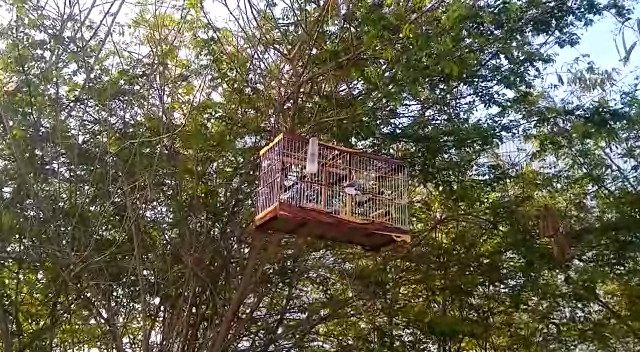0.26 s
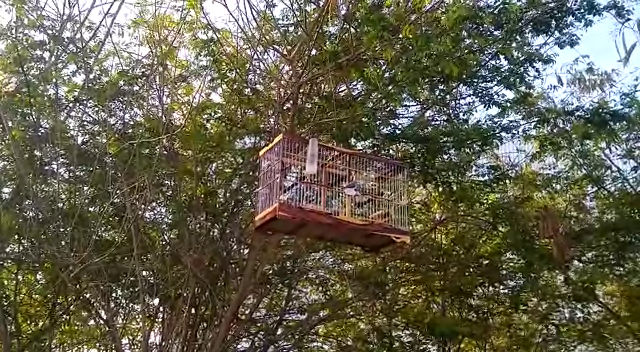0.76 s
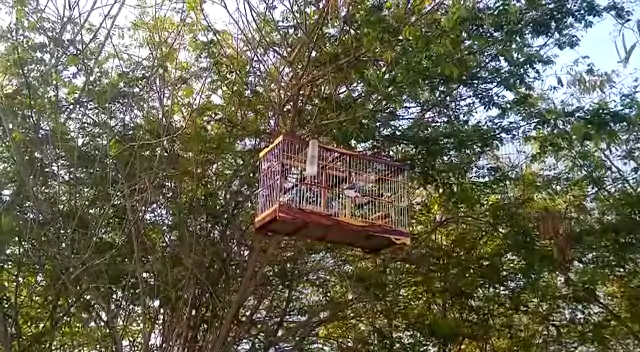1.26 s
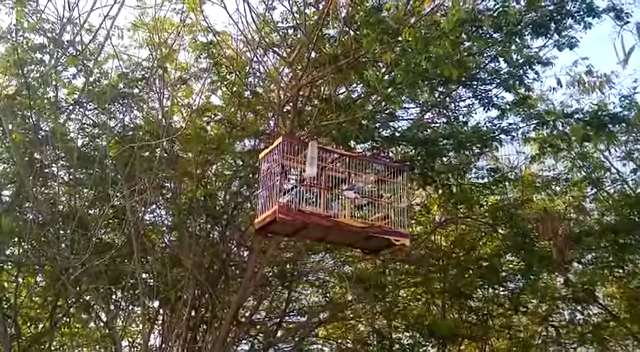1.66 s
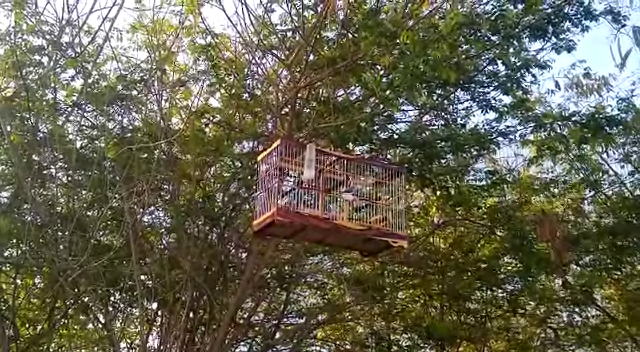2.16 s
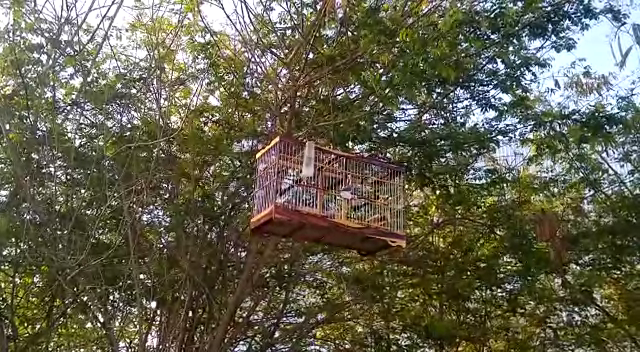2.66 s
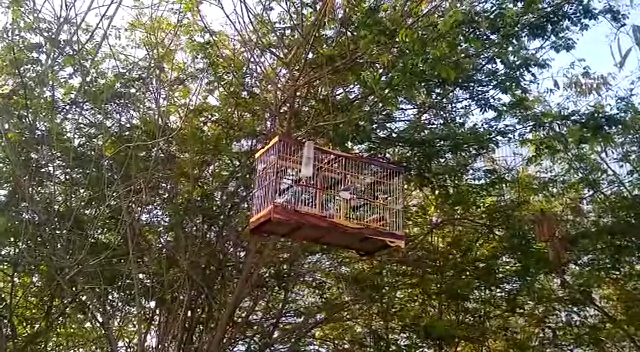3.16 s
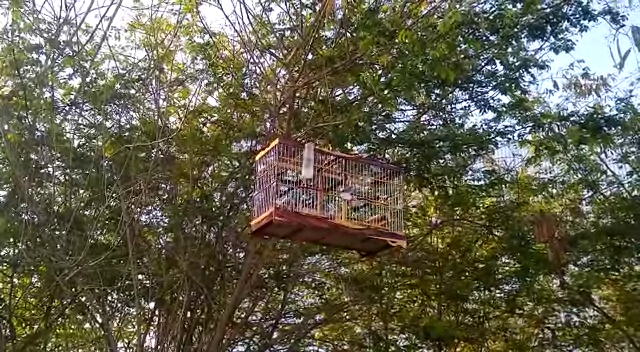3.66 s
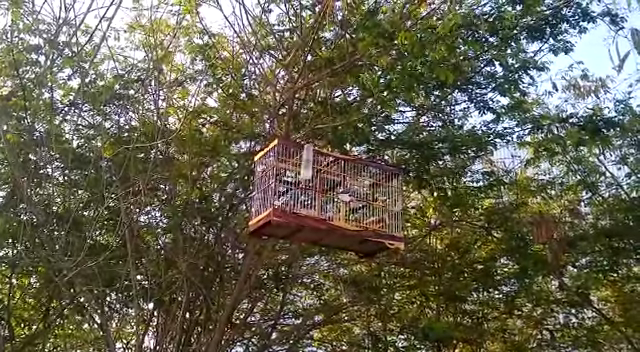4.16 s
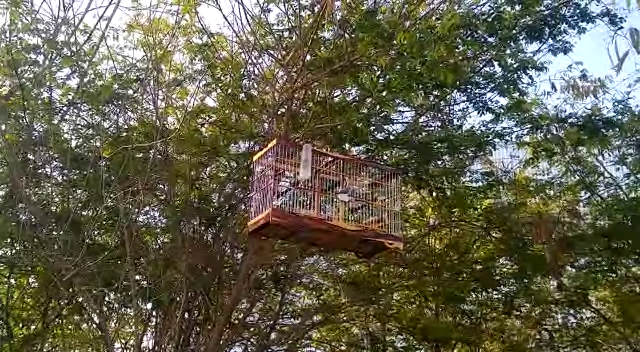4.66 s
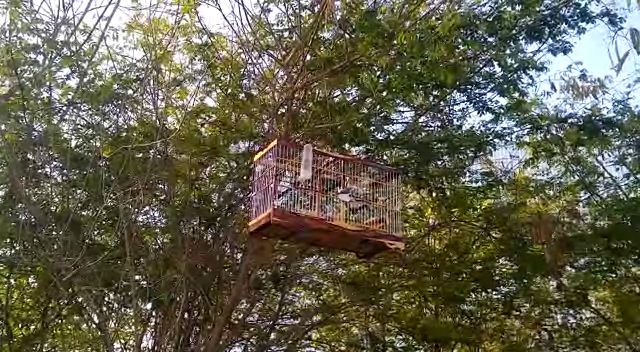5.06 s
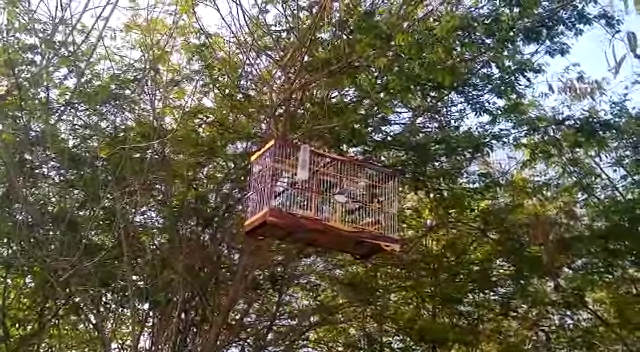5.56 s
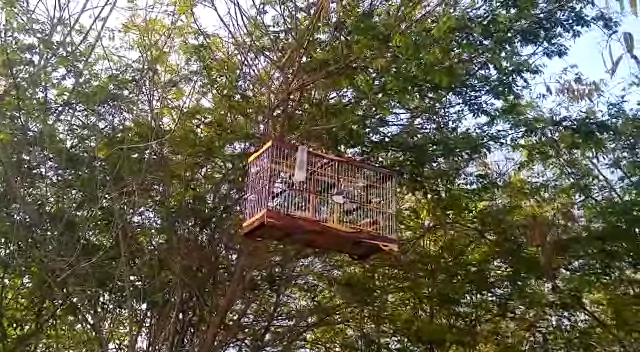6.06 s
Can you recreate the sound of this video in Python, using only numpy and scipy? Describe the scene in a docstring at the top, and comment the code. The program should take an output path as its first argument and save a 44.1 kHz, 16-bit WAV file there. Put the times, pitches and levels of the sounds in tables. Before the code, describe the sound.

Four warbled rising whistles and three sharp falling chirps from a near bird, then quiet leaf hiss, far twitters and one short harsh call.

```python
"""Caged songbird in a tree

A small bird ends a phrase: four warbled rising whistles, three tumbling falling calls, later one harsh
two-voiced call. Its whistles are warbled sines with overtones and breath; the harsh call mixes two pitches.
Far birds twitter and pipe as thin glides, over hum, leaf hiss and rumble of filtered noise; a claw ticks.
Trees and walls answer with decaying noise echoes; the phone's expander turns the quiet moments down."""
import sys
import numpy as np
from scipy import signal
from scipy.fft import rfft, irfft, next_fast_len
from scipy.io import wavfile
from scipy.ndimage import uniform_filter1d, minimum_filter1d, map_coordinates

SR = 44100
rng = np.random.default_rng(int(sys.argv[2]) if len(sys.argv) > 2 else 0)


def wav_out(sig):
    """Save sig, one row per channel (or a flat mono array), as 16-bit PCM at SR to the path in sys.argv[1]."""
    wavfile.write(sys.argv[1], SR, np.round(np.clip(np.atleast_2d(sig).T, -1, 1) * 32767).astype(np.int16))


N = 278701


def amp(db):
    """Decibels to gain."""
    return 10 ** (np.asarray(db) / 20)


def unit(x):
    """Scaled to rms 1."""
    return x / np.sqrt(np.mean(x ** 2) + 1e-20)


def along(points, hz, axis=1):
    """One column of (Hz, value, ..) points, interpolated on a log frequency axis."""
    p = np.transpose(points)
    return np.interp(np.log(hz + 1), np.log(p[0] + 1), p[axis])


def wobble(knots_per_s, size=N):
    """A smooth random curve through normally distributed knots."""
    knots = rng.standard_normal(int(size * knots_per_s / SR) + 4)
    return map_coordinates(knots, [np.arange(size) * knots_per_s / SR])


def filtered(x, response):
    """x times a complex response of frequency."""
    m = next_fast_len(N + SR // 2)
    return irfft(rfft(x, m) * response(np.fft.rfftfreq(m, 1 / SR)), m)[..., :N]


def shaped_noise(points, size=N):
    """Noise of rms 1 with its spectrum along (Hz, dB per Hz) points."""
    return unit(filtered(rng.standard_normal(size), lambda hz: amp(along(points, hz))))


def sampled(rows):
    """First sample, then one value per sample for time and each column of a note."""
    s, *cols = np.transpose(rows)
    t = np.arange(round(s[0] * SR), round(s[-1] * SR)) / SR
    return round(s[0] * SR), t, [np.interp(t, s, c) for c in cols]


# Hiss spectrum. Each row: frequency in Hz, relative density in dB per Hz.
AIR_SPECTRUM = [(30, -46.5), (48, -5), (85, -14.5), (125, -10), (160, -10.5), (250, -13), (312, -15),
                (410, -15), (720, -17), (920, -19.5), (1800, -22.5), (4500, -30.5), (8000, -34.5),
                (15800, -38)]
# Left-right likeness of the hiss. Each row: frequency in Hz, correlation from 0 to 1.
LIKENESS = [(60, .85), (290, .92), (640, .62), (1400, .5), (2500, .15), (6000, 0)]
# Distant drone. Each row: centre in Hz, width in Hz, mean level in dB.
DRONE = [(81, 25, -63.5), (330, 35, -65), (361, 15, -70.5), (1930, 152, -75.5)]
# Low rumble that swells and sinks. Each row: time in seconds, level in dB before its random wobble.
RUMBLE_SWELL = [(0, -81), (0.403, -69), (.9, -55), (1.4, -70), (2, -64), (2.699, -65), (3.4, -65.5),
                (4, -68.5), (4.601, -58), (5.2, -69.5), (5.8, -68), (6.32, -76.5)]


def air():
    """Drone and leaf hiss from the left, alike in the bass and unrelated in the treble, over a rumble."""
    z = signal.stft(rng.standard_normal((2, N)), nperseg=512)[2]
    field = uniform_filter1d(uniform_filter1d(rng.standard_normal(z.shape[1:]), 6, 0), 14, 1)
    pair = signal.istft(z * amp(0.4 * unit(field)), nperseg=512)[1][:, :N]

    def mid_side_response(hz):
        turn = np.arccos(np.clip(along(LIKENESS, hz), -1, 1)) / 2
        return amp(along(AIR_SPECTRUM, hz)) * [np.cos(turn), np.sin(turn)]

    def band(centre_hz, width_hz, size=N):
        noise = rng.standard_normal(size)
        return unit(filtered(noise, lambda hz: np.exp(-((hz - centre_hz) / width_hz) ** 2)))

    mid, side = filtered(pair, mid_side_response)
    hiss = amp(-57.5 + .8 * wobble(1.5)) * unit(np.array([mid + side, mid - side]))
    left, right = hiss + sum(amp(db + 1.3 * wobble(2.5)) * band(hz, width) for hz, width, db in DRONE)
    swell_db = np.interp(np.arange(N) / SR, *np.transpose(RUMBLE_SWELL)) + 2.5 * wobble(16)
    rumble = amp(swell_db) * band(69, 64, size=(3, N))
    late_right = np.roll(right, 17)  # samples
    both = np.array([left, late_right]) + rumble[0] + 0.64 * rumble[1:]
    return both * amp([[-.7], [.7]])


# Breath in the song. Each row: frequency in Hz, relative density in dB per Hz.
SONG_BREATH = [(2000, -28), (5000, -10), (8500, -6), (10700, 0), (12300, -5), (14500, 2), (15900, 1)]
# How strongly overtones sound, by frequency. Each row: frequency in Hz, gain in dB.
OVERTONE_GAIN = [(6000, -14), (7500, -8), (8800, -2), (9700, -3), (10700, 5), (11800, -4), (13000, -3),
                 (14500, 2), (16000, 0)]


def whistles(notes, warble_hz, slowing_per_s, pulse, second_db, third_db, breath_db, husk, edge_s):
    """A near-pure tone; the warble swings pitch, pulses level and leaks breath, as do husky notes."""
    out, leak = np.zeros(N), np.zeros(N)
    for rows in notes:
        i, t, (hz, db, depth_hz) = sampled(rows)
        rate_hz = warble_hz * (1 - slowing_per_s * (t - t[0]))
        swing = 2 * np.pi * (np.cumsum(rate_hz) / SR + rng.random()) + .7 * wobble(70, size=len(t))
        swung_hz = hz + depth_hz * amp(1.5 * wobble(90, size=len(t))) * np.sin(swing)
        phase = 2 * np.pi * np.cumsum(swung_hz) / SR
        tone = np.sin(phase) + amp(second_db + along(OVERTONE_GAIN, 2 * hz)) * np.sin(2 * phase)
        tone += amp(third_db + along(OVERTONE_GAIN, 3 * hz)) * (3 * hz < SR / 2) * np.sin(3 * phase)
        fourth = amp(third_db + along(OVERTONE_GAIN, 4 * hz)) * (4 * hz < SR / 2)
        tone += fourth * np.clip(depth_hz / 300, 0, 1) * np.sin(4 * phase)
        begun = np.clip((t - t[0]) / edge_s, 0, 1) if i else 1  # a note at sample 0 is already under way
        ends = np.sin(np.pi / 2 * begun * np.clip((t[-1] - t) / edge_s, 0, 1)) ** 2
        beat = 1 + np.clip(pulse * depth_hz / hz, 0, .95) * np.sin(swing + 0.43)
        level = np.sqrt(2) * amp(db + .6 * wobble(250, size=len(t)))
        out[i:i + len(t)] += level * ends * beat * tone
        opening = np.abs(depth_hz) / hz + husk * (hz < 6000) * (i > 0)
        leak[i:i + len(t)] += amp(db + breath_db) * ends * opening
    return out + uniform_filter1d(leak, 500) * shaped_noise(SONG_BREATH)


# End of an earlier note. Each row: time in seconds, pitch in Hz, level in dB, warble depth in Hz.
EARLIER_NOTE = [(0, 3790, -29, 0.006), (.012, 3600, -30.5, 0), (.032, 3720, -38, 0.0038)]


def earlier_note():
    """Rows of a note already sounding at the start, dipping in pitch and fading."""
    return EARLIER_NOTE


# Rising whistles. Each row: start in s, warble settled in s, end in s, top pitch in Hz, level before
# the climb in dB, level the climb leads to in dB, last kick up in Hz.
RISING_NOTES = [(.136, 0.193, 0.27, 4782, -37.5, -12.5, 40), (.335, 0.423, 0.4876, 4787, -32.5, -11.5, 110),
                (.546, 0.639, 0.7023, 4702, -31.5, -12.5, 168), (.762, 0.865, 0.91, 4535, -31.5, -14, 173)]
# Shared climb. Each row: seconds before the end, share of the way to top pitch, share to peak level.
SHARED_CLIMB = [(.125, 0.024, 0.12), (.095, .1, 0.081), (.075, .27, .3), (.058, .5, 0.58), (0.039, .8, 0.9),
                (.015, 0.96, 0.96), (0.014, 0.99, 0.97)]
BASE_HZ = 3272  # before the climb
WARBLE_DEPTH_HZ, STEADY_DEPTH_HZ, SETTLING_S = 499.8, 30, .022
DEPTH_SHARE_BEFORE_SETTLING, HANG_SHARE = 0.71, .35  # warble hangs under the climb by a share of depth
ONSET_DB, ONSET_S = 21, .015  # starts this far down and recovers
CLOSE_DB, CLOSE_S = 5, .015  # sinks at the end
KICK_BEFORE_END_S, KICK_TAKES_S, KICK_DB_PER_HZ = .021, .008, 0.02


def rising():
    """Rows (s, Hz, dB, depth Hz) of each rising whistle: a soft warble, one shared climb, a quick close."""
    before, pitch, level = np.transpose(SHARED_CLIMB)
    for start, steady, end, top_hz, low_db, peak_db, kick_hz in RISING_NOTES:
        t = np.linspace(start, end, 40)
        pitch_share = np.interp(t - end, -before, pitch)
        level_share = np.interp(t - end, -before, level)
        hz = BASE_HZ + (top_hz - BASE_HZ) * pitch_share
        db = low_db + (peak_db - low_db) * level_share - ONSET_DB * np.exp((start - t) / ONSET_S)
        db -= CLOSE_DB * np.clip(1 - (end - t) / CLOSE_S, 0, 1)
        # pitch waits below the climb until the kick releases it
        unreleased = np.clip((end - KICK_BEFORE_END_S - t) / KICK_TAKES_S + 1, 0, 1)
        waiting_hz = kick_hz * pitch_share * unreleased
        hz, db = hz - waiting_hz, db - KICK_DB_PER_HZ * waiting_hz
        depths_hz = [WARBLE_DEPTH_HZ, DEPTH_SHARE_BEFORE_SETTLING * WARBLE_DEPTH_HZ, STEADY_DEPTH_HZ]
        depth_hz = np.interp(t, [start, steady - SETTLING_S, steady], depths_hz)
        yield np.transpose([t, hz - HANG_SHARE * depth_hz, db, depth_hz])


# Slides that open the falling calls. Each row: start in s, knee in s, end in s, first pitch in Hz
# before the hook, knee pitch in Hz, last pitch in Hz, knee level in dB, last level in dB.
FALLING_SLIDES = [(0.957, .985, 1.013, 7100, 6600, 5640, -21.5, -19),
                  (1.13, 1.155, 1.186, 7400, 7080, 6006, -19.5, -24),
                  (1.335, 1.358, 1.386, 7900, 7530, 6150, -19, -25)]
HOOK_HZ, HOOK_S = 350, 0.0055  # drops in from above
SLIDE_IN_DB = 15  # starts this far down
SLIDE_CLEAR_HZ, SLIDE_ROUGH_HZ = 15, 90  # warble depth up to the knee and at the end


def slides():
    """Rows of the slides: they hook in, swell to the knee and then roughen."""
    for s0, s1, s2, hz0, hz1, hz2, db1, db2 in FALLING_SLIDES:
        t = np.linspace(s0, s2, 30)
        hz = np.interp(t, [s0, s1, s2], [hz0, hz1, hz2]) + HOOK_HZ * np.exp((s0 - t) / HOOK_S)
        db = np.interp(t, [s0, s1, s2], [db1, db1, db2])
        db -= SLIDE_IN_DB * np.clip((s1 - t) / (s1 - s0), 0, 1) ** 1.6
        depth_hz = np.interp(t, [s1, (s1 + s2) / 2], [SLIDE_CLEAR_HZ, SLIDE_ROUGH_HZ])
        yield np.transpose([t, hz, db, depth_hz])


# Flicks that tumble after the slides. Each row: start in s, loudest in s, end in s, first pitch in Hz,
# loudest pitch in Hz, last pitch in Hz, peak level in dB.
TUMBLING_FLICKS = [(1.012, 1.014, 1.02, 4730, 5100, 5550, -19),
                   (1.017, 1.025, 1.034, 5400, 5500, 5650, -12),
                   (1.033, 1.046, 1.06, 4653, 5150, 5100, -13.5),
                   (1.058, 1.069, 1.083, 4136, 5100, 5100, -13.5),
                   (1.178, 1.183, 1.187, 4736, 5040, 5230, -28.5),
                   (1.182, 1.192, 1.203, 5498, 5600, 5850, -16),
                   (1.198, 1.202, 1.208, 4170, 4600, 4960, -23),
                   (1.204, 1.219, 1.226, 4458, 5050, 5040, -13),
                   (1.223, 1.241, 1.255, 3750, 4550, 5000, -18.5),
                   (1.382, 1.384, 1.389, 4420, 5000, 5200, -26.5),
                   (1.387, 1.398, 1.407, 5580, 5405, 5450, -13.5),
                   (1.403, 1.407, 1.412, 4353, 4615, 5300, -23.5),
                   (1.408, 1.422, 1.43, 4340, 4883, 5030, -14.5),
                   (1.43, 1.447, 1.465, 3650, 4450, 5130, -20)]
FLICK_IN_DB, FLICK_OUT_DB, FADE_POWER = 19, 15, 1.8  # under the peak at both ends
CLEAR_DEPTH_HZ, ADDED_DEPTH_HZ = 25, 90  # warble at the peak, and added to it at the ends
HALFWAY_SHARE = 0.82  # of the last pitch change, made halfway through it


def flicks():
    """Rows of the flicks: short pitch sweeps, loudest and clearest inside."""
    for s0, s1, s2, hz0, hz1, hz2, db in TUMBLING_FLICKS:
        t = np.linspace(s0, s2, 20)
        away = np.interp(t, [s0, s1, s2], [1, 0, 1]) ** FADE_POWER
        halfway_hz = hz1 + HALFWAY_SHARE * (hz2 - hz1)
        hz = np.interp(t, [s0, s1, (s1 + s2) / 2, s2], [hz0, hz1, halfway_hz, hz2])
        fade_db = np.where(t > s1, FLICK_OUT_DB, FLICK_IN_DB) * away
        yield np.transpose([t, hz, db - fade_db, CLEAR_DEPTH_HZ + ADDED_DEPTH_HZ * away])


# Low closing notes. Each row: start in s, point in s, end in s, first pitch in Hz, point pitch in Hz,
# last pitch in Hz, level at the point in dB.
CLOSING_NOTES = [(1.248, 1.263, 1.292, 3300, 3850, 3007, -31.5),
                 (1.451, 1.475, 1.498, 3421, 3993, 3183, -31.5)]
POINT_POWER, CLOSING_IN_DB, CLOSING_OUT_DB = 2.8, 12, 16


def closing_notes():
    """Rows of the low notes ending the last two falling calls: pitch climbs to a point and sinks."""
    for s0, s1, s2, hz0, hz1, hz2, db in CLOSING_NOTES:
        t = np.linspace(s0, s2, 30)
        near, late = np.interp(t, [s0, s1, s2], [0, 1, 0]), t > s1
        foot_hz = np.where(late, hz2, hz0)
        hz = foot_hz + (hz1 - foot_hz) * near ** POINT_POWER
        fade_db = np.where(late, CLOSING_OUT_DB, CLOSING_IN_DB) * (1 - near) ** 3
        yield np.transpose([t, hz, db - fade_db, CLEAR_DEPTH_HZ + 0 * t])


# Tone colour of the far birds, loudest near 4.6 kHz. Each row: frequency in Hz, gain in dB.
FAR_COLOUR_GAIN = [(1400, 1.5), (3000, -7.5), (4600, 7.5), (6000, 0), (8000, -5)]


def far_birds(table, bend, rough_db, pan_db):
    """Thin sine glides, steep at first for a positive bend, flickering through the leaves."""
    out = np.zeros((2, N))
    for s0, s1, hz0, hz1, db in table:
        u = np.linspace(0, 1, round((s1 - s0) * SR))
        hz = hz1 + (hz0 - hz1) * (np.exp(-bend * u) - np.exp(-bend)) / (1 - np.exp(-bend))
        tone = np.sin(2 * np.pi * np.cumsum(hz) / SR + [[0], [1.3]])
        level_db = db + along(FAR_COLOUR_GAIN, hz) + rough_db * wobble(120, size=len(u))
        shape = np.sin(np.pi * u) ** 0.3 * amp(level_db)
        out[:, round(s0 * SR):][:, :len(u)] += amp([[pan_db / 2], [-pan_db / 2]]) * shape * tone
    return out


# Each row: start in s, end in s, first pitch in Hz, last pitch in Hz, level before colour gain in dB.
TWITTER_NOTES = [(1.715, 1.735, 4500, 3950, -65), (1.755, 1.772, 4520, 3800, -67),
                 (1.764, 1.81, 7200, 3536, -59.5), (1.824, 1.852, 4450, 3025, -56.5),
                 (1.843, 1.89, 5570, 3490, -55.5), (1.992, 2.03, 7050, 4014, -68),
                 (2.012, 2.05, 5600, 3880, -67), (2.076, 2.125, 6760, 3380, -64.5),
                 (2.252, 2.272, 4510, 3590, -57.5), (2.254, 2.306, 6800, 3830, -62.5),
                 (2.298, 2.315, 6530, 5700, -73.5), (2.346, 2.37, 5790, 3930, -65),
                 (2.352, 2.385, 5500, 4790, -73), (2.404, 2.42, 4800, 3865, -67),
                 (2.41, 2.47, 7900, 3304, -64.5), (2.828, 2.87, 7140, 3680, -68),
                 (3.018, 3.072, 6400, 3600, -66.5), (3.126, 3.156, 6800, 3870, -66.5),
                 (3.228, 3.25, 5600, 4230, -68), (3.495, 3.53, 5600, 3506, -70.5),
                 (3.645, 3.66, 5340, 4000, -58.5), (3.71, 3.74, 5000, 3670, -67),
                 (3.872, 3.886, 6830, 5600, -69.5), (4.043, 4.065, 6400, 5200, -71),
                 (4.045, 4.072, 4030, 3100, -67), (4.09, 4.13, 5600, 3900, -74),
                 (4.275, 4.32, 5600, 3953, -69.5), (4.958, 4.985, 5900, 4000, -71.5)]


def twitter():
    """Quick far falling glides, steep at first and rough in level, toward the right."""
    return far_birds(TWITTER_NOTES, bend=1.1, rough_db=3.5, pan_db=-3.5)


# Each row: start in s, end in s, first pitch in Hz, last pitch in Hz, level before colour gain in dB.
PIPING_NOTES = [(1.795, 1.815, 1522, 1522, -65), (1.897, 1.935, 1545, 1520, -62),
                (1.903, 1.94, 4800, 4550, -63), (1.945, 1.975, 4650, 4550, -68),
                (3.105, 3.26, 6750, 6350, -74), (3.615, 3.66, 4700, 4640, -64),
                (3.615, 3.64, 5140, 5100, -70), (4.0, 4.05, 1380, 1395, -69),
                (4.125, 4.24, 2720, 2720, -60), (4.35, 4.4, 2700, 2680, -68), (4.36, 4.4, 4810, 4530, -76),
                (4.45, 4.5, 5060, 4950, -75), (4.66, 4.7, 2840, 2814, -67), (4.78, 4.84, 2870, 2867, -58),
                (4.855, 4.93, 2850, 2820, -56), (5.34, 5.375, 4150, 4100, -74),
                (5.57, 5.62, 4600, 4530, -77), (5.65, 5.685, 4500, 4400, -74),
                (5.77, 5.83, 1400, 1656, -70), (5.9, 5.95, 4470, 4700, -75), (6.09, 6.17, 4340, 4290, -74),
                (6.25, 6.28, 2626, 2596, -65)]


def piping():
    """Far, nearly level pipes, smoother and further right."""
    return far_birds(PIPING_NOTES, bend=-0.61, rough_db=0.5, pan_db=-7)


# A claw on the cage. Each row: time in seconds, strength in dB.
CLAW_TICKS = [(2.8697, -52), (5.357, -54.5)]


def tick():
    """A short dry noise click with a faint ring of wire."""
    out, t = np.zeros(N), np.arange(600) / SR
    for s, db in CLAW_TICKS:
        click = np.diff(rng.standard_normal(601)) * amp(-60 * t / .012)
        ring = 1.4 * amp(-60 * t / 0.037) * np.sin(2 * np.pi * 10500 * t)
        out[round(s * SR):][:600] += amp(db) * (click + ring)
    return out


# Both sides of the syrinx. Each row: time in s, low voice in Hz, high voice in Hz, level in dB, rasp in dB.
HARSH_VOICES = [(5.39, 2262, 3900, -75, -64), (5.413, 2500, 3900, -62, -50),
                (5.417, 3200, 3591, -49.5, -45), (5.422, 2336, 3443, -42, -43.5),
                (5.445, 2258, 3030, -40, -44), (5.46, 2016, 2810, -40.5, -41),
                (5.478, 1705, 2270, -41.5, -48.5), (5.488, 1600, 2050, -52, -49),
                (5.51, 1600, 2000, -88, -62.5)]
# Mixed tones. Each row: times the low voice, times the high voice.
MIXED_TONES = [(2, 0), (0, 2), (1, 1), (-1, 3), (1, 0), (0, 1), (2, 1), (0, 3), (3, 1), (4, 1), (3, 0),
               (-2, 4)]
# Their strengths, in the same order. Each row: early in dB, late in dB, relative to the call's level.
TONE_STRENGTHS = [(0, -15), (-9, 0), (-11, -11), (-17, -4), (-18, -27), (-17, -21), (-13, -24), (-22, -20),
                  (-24, -32), (-25, -34), (-17, -26), (-22, -13)]
# Breath in the call. Each row: frequency in Hz, relative density in dB per Hz.
RASP_SPECTRUM = [(1500, -36), (3000, -22), (4800, -5), (7000, -6), (8500, 0), (11000, -4), (13000, -5),
                 (15900, -9)]


def harsh_call():
    """Two voices mix into sums and differences of their pitches, over a breathy rasp."""
    out = np.zeros(N)
    i, t, (low_hz, high_hz, db, rasp_db) = sampled(HARSH_VOICES)
    low, high = 2 * np.pi * np.cumsum([low_hz, high_hz], axis=1) / SR
    late = np.clip((t - 5.44) / 0.021, 0, 1)
    tones = np.zeros(len(t))
    for (m, n), (early_db, late_db) in zip(MIXED_TONES, TONE_STRENGTHS):
        strength_db = early_db + (late_db - early_db) * late + 1.5 * wobble(150, size=len(t))
        tones += amp(strength_db) * np.sin(m * low + n * high)
    rasp = shaped_noise(RASP_SPECTRUM)[:len(t)]
    out[i:i + len(t)] = np.sqrt(2) * amp(db) * tones + amp(rasp_db) * rasp
    return out


# Left port against right, shaded by the phone's body. Each row: frequency in Hz, gain in dB, radians ahead.
LEFT_PORT = [(2560, -36.5, 0.74), (3000, 0.5, 0.34), (3700, -4.5, .1), (4200, -8, .5), (4900, -5.5, 1.1),
             (5940, -4.5, 3.17), (6123, 2.5, 1.7), (6940, 0, 0.32), (7600, 2, 1.3), (8740, -0.5, .4),
             (11200, -20, 1.4), (12000, -9, 3.8), (13500, -12, 3), (15500, -11.5, 3.8)]


def ports(x, lag_s):
    """The two microphone ports hear the cage differently; the lag delays the left."""
    def left(hz):
        turn = along(LEFT_PORT, hz, axis=2) - 2 * np.pi * hz * lag_s
        return amp(along(LEFT_PORT, hz)) * np.exp(1j * turn)
    return np.array([filtered(x, left), x])


# Scatter from the trees. Each row: frequency in Hz, 60 dB decay time in s, relative level in dB.
TREE_SCATTER = [(2000, .3, 5), (4860, 0.41, -6.5), (6500, 0.19, 10.5), (12000, 0.18, 4)]


def answer(x, scatter_db, far_db, walls):
    """Scatter from leaves and branches, a long faint tail and smeared slaps from walls (s, dB)."""
    hz, t, z = signal.stft(rng.standard_normal((2, SR)), SR, nperseg=256)
    t60_s, level_db = along(TREE_SCATTER, hz)[:, None], along(TREE_SCATTER, hz, axis=2)[:, None]
    decay = amp(scatter_db + (level_db - 60 * t / t60_s)) + amp(far_db - 60 * t / 1.3)
    tail = signal.istft(z * decay, SR, nperseg=256)[1][:, :SR] / np.sqrt(SR)
    tail[:, :200] = 0  # echoes start late
    for s, db in walls:
        tail[:, round(s * SR):][:, :150] += amp(db) * rng.standard_normal((2, 150)) / np.sqrt(150)
    return signal.fftconvolve(x, tail, axes=1)[:, :N]


# Walls that answer the near bird. Each row: delay in seconds, level in dB.
NEAR_WALLS = [(.011, -20), (.118, -32), (.175, -39)]


def scene():
    """Near bird, far birds, their echoes and the air."""
    song = whistles(rising(), warble_hz=187.0, slowing_per_s=2.4, pulse=2.9, second_db=-33.5,
                    third_db=-27.5, breath_db=-9, husk=0, edge_s=.003)
    song += whistles(slides(), warble_hz=232, slowing_per_s=-2, pulse=28, second_db=-16.5,
                     third_db=-26, breath_db=11.5, husk=0.03, edge_s=0.0025)
    short_notes = [earlier_note(), *flicks(), *closing_notes()]
    song += whistles(short_notes, warble_hz=256, slowing_per_s=0.079, pulse=22, second_db=-28.0,
                     third_db=-25, breath_db=8, husk=0.04, edge_s=0.0035)
    near = ports(song + tick(), lag_s=0) + ports(harsh_call(), lag_s=7e-5)
    far = twitter() + piping()
    far_echoes = answer(far, scatter_db=15, far_db=-3, walls=[(.019, -7)])
    near_echoes = answer(near, scatter_db=-0.5, far_db=-26.5, walls=NEAR_WALLS)
    return near + far + near_echoes + far_echoes + air()


CLOSED_DB, RANGE_DB, CUT_DB = -51, 13, -8.5  # full cut at and below the first, none above the range
TOP_HZ, BASS_CUT_HZ = 16000, 40


def record(dry):
    """An expander lowers the gain while the level stays low; deep bass and all above the band are cut."""
    power = np.abs(uniform_filter1d(np.mean(dry ** 2, axis=0), 900))
    held = -minimum_filter1d(-power, 2000, origin=700)  # the detector holds its peak for a moment
    opened = np.clip((10 * np.log10(held + 1e-12) - CLOSED_DB) / RANGE_DB, 0, 1)
    gain = amp(CUT_DB * (1 - uniform_filter1d(opened, 1500)))
    return filtered(dry * gain, lambda hz: (hz < TOP_HZ) / (1 + (BASS_CUT_HZ / (hz + 1)) ** 6))


dry = scene()
out = record(dry)
wav_out(out)
```